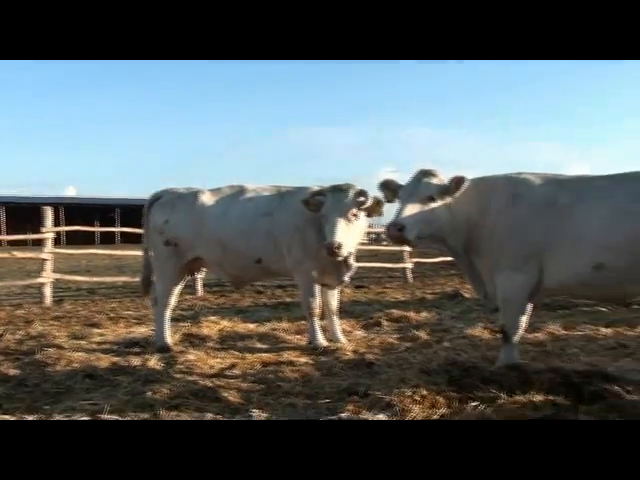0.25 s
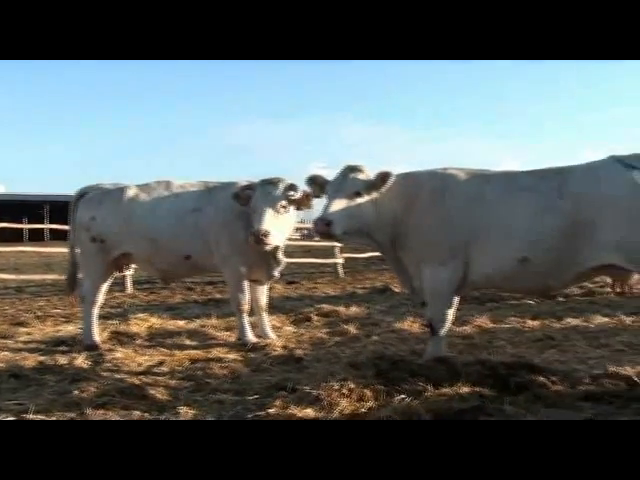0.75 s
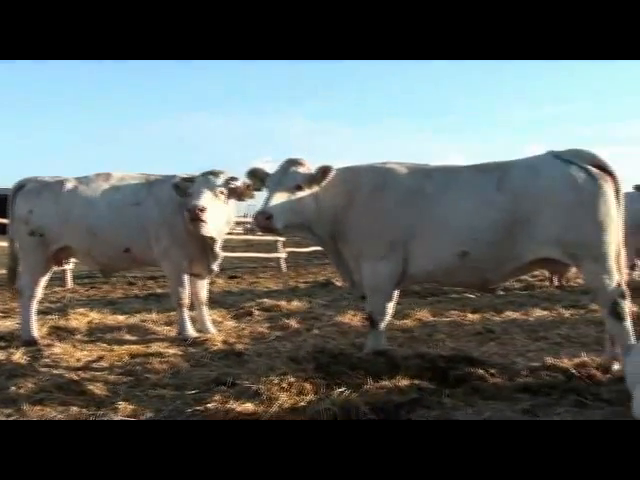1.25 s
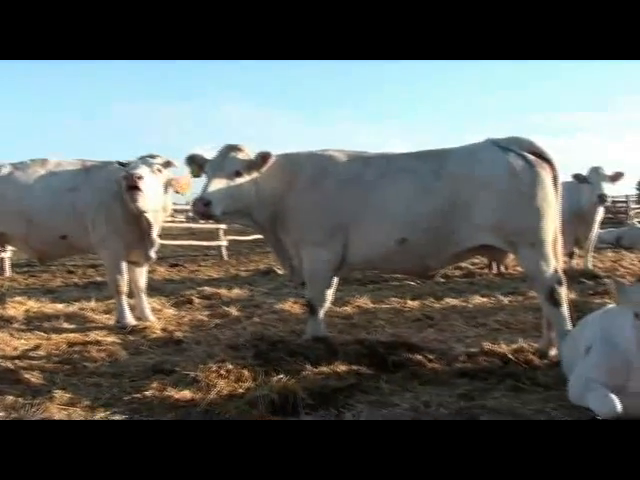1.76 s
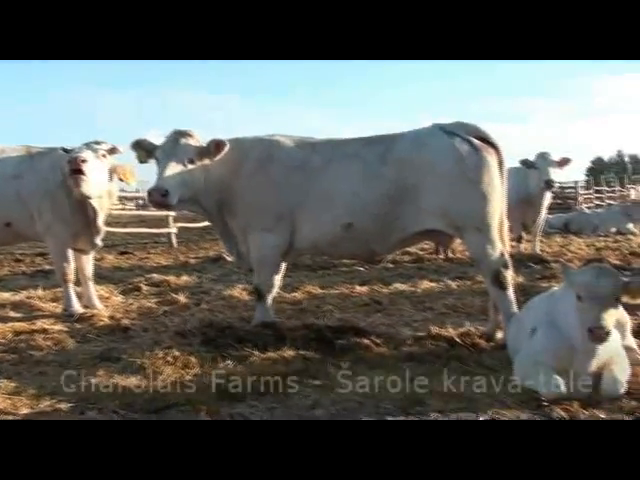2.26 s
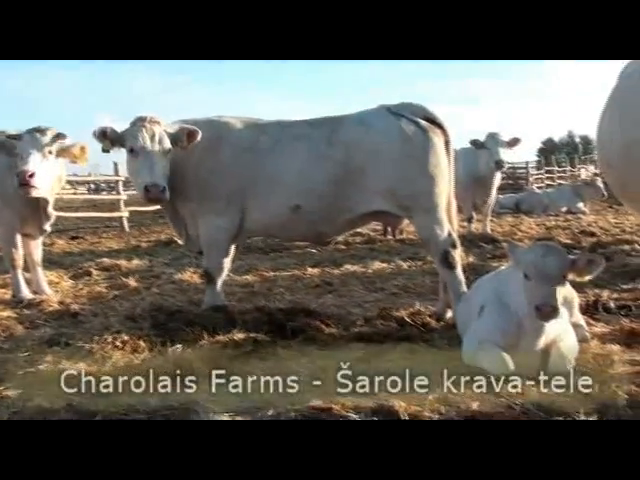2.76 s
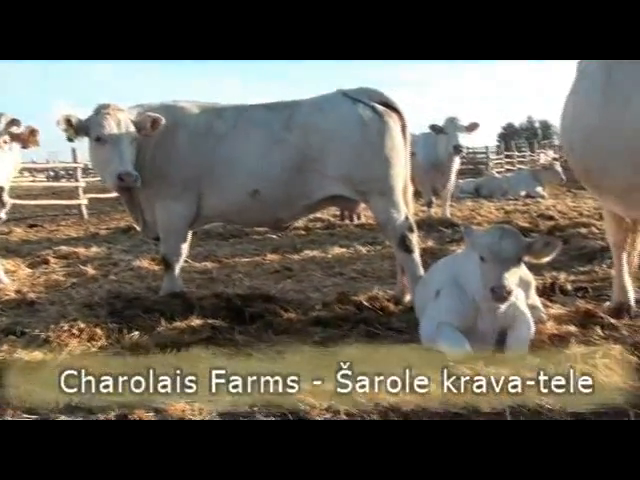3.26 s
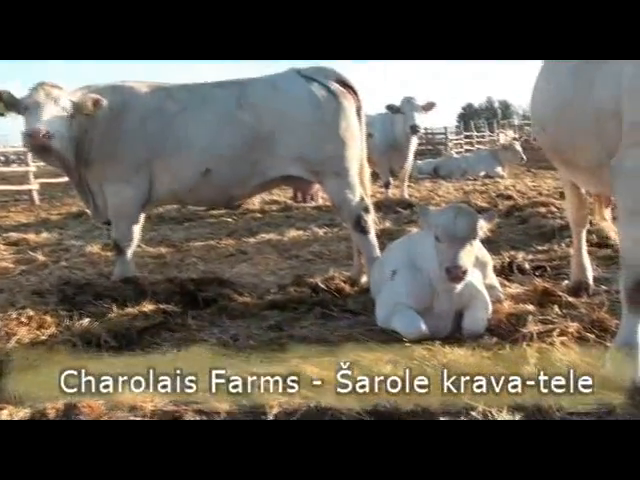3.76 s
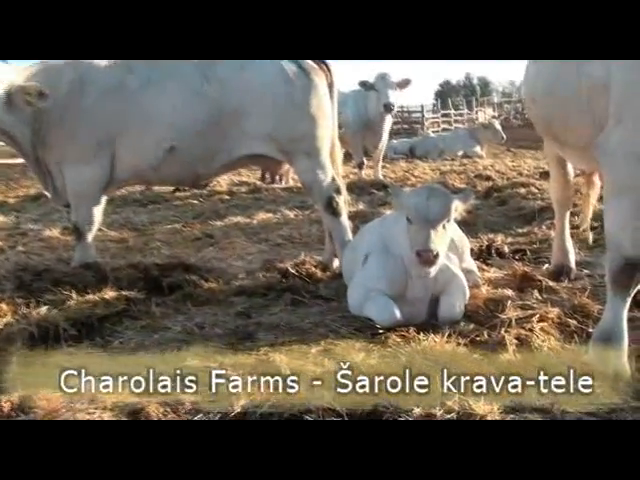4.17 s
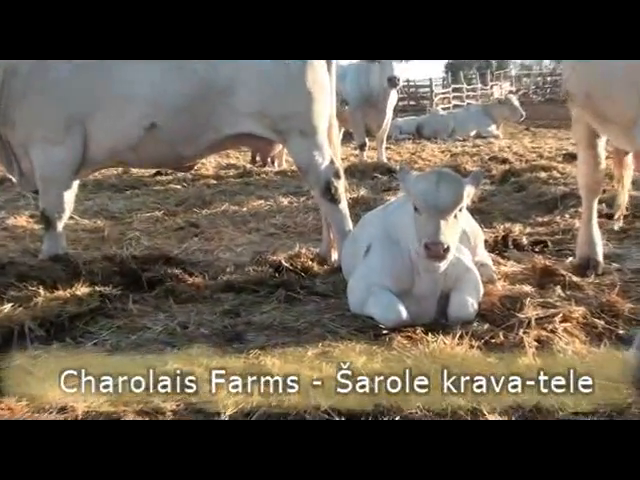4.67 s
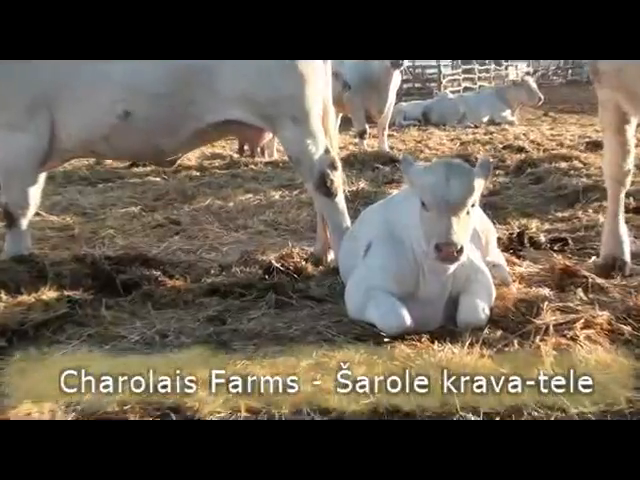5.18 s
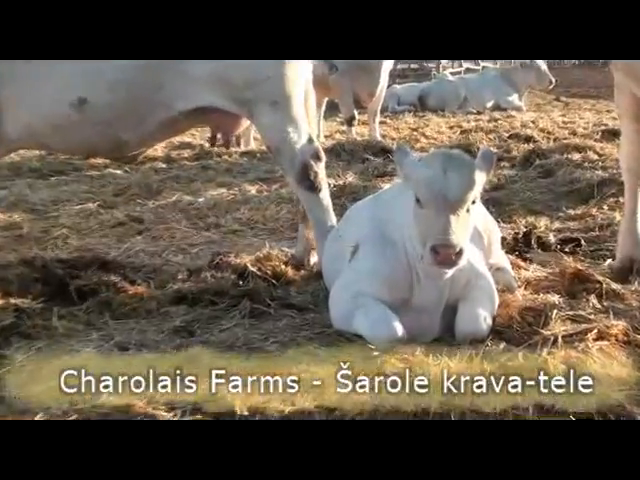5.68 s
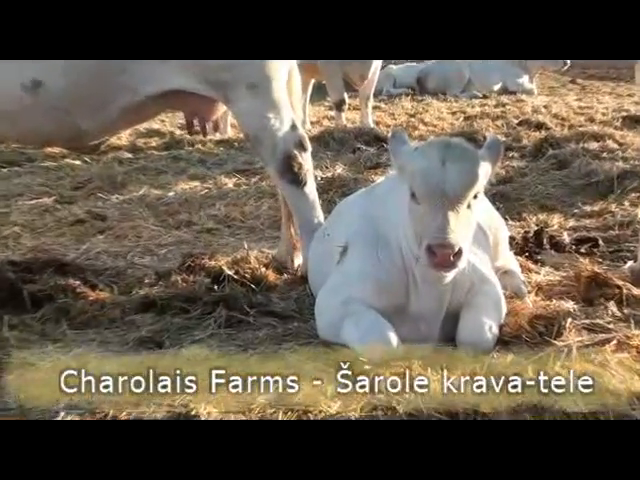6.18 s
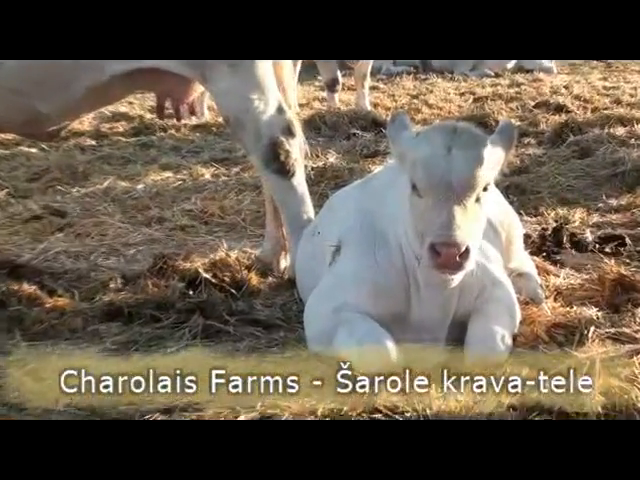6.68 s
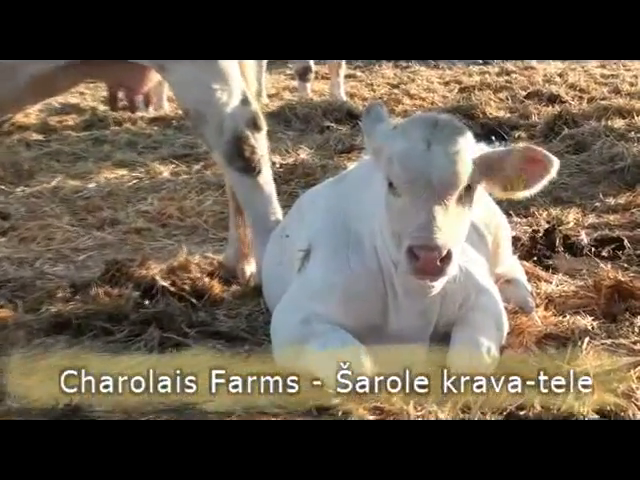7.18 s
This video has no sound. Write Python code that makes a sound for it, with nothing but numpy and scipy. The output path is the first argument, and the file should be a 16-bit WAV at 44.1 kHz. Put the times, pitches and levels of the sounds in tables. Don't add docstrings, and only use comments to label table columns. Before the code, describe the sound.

Cows take turns lowing outdoors. A rough calf answers quietly at the start and again under the first big moo. The second call climbs to a strained pitch; the third cracks open while it ends, then falls away. Air hiss and distant engine rumble remain, with tiny straw snaps, until a final closed-mouth groan grows with a far cow behind. The nearest animals sound fairly dry, spread modestly across stereo.

```python
import sys
import numpy as np
from scipy import signal
from scipy.fft import rfft, irfft
from scipy.io import wavfile
from scipy.ndimage import uniform_filter1d

SR = 44100
rng = np.random.default_rng(int(sys.argv[2]) if len(sys.argv) > 2 else 0)


def makeup_ratio(level_db):
    decades = np.asarray(level_db, float) / 20
    return 10 ** decades


def generate_wav(signal):
    frames = np.transpose(np.atleast_2d(signal))
    scaled = np.clip(frames, -1, 1) * 32767
    pcm = np.round(scaled).astype(np.int16)
    wavfile.write(sys.argv[1], SR, pcm)


N = 327222

# start_s [s], pitch_hz [Hz], level_db [dB]; a START creaks up to its MOO
TAIL_MOO = [(0.0, 138.9, -20)]
FIRST_MOO = [(0.629, 52.4, -56.5), (0.859, 66.3, -31.5), (1.046, 76.67, -27), (1.173, 85.5, -23.5),
             (1.287, 96.7, -18), (1.547, 120.4, -17), (1.659, 127.4, -19.5), (1.813, 133, -17),
             (2.297, 137.1, -17)]
SECOND_START = [(1.8, 90.9, -31), (1.98, 98, -31), (2.141, 105, -36.5), (2.399, 111.3, -26)]
SECOND_MOO = [(2.43, 112.1, -20), (2.851, 120.1, -19), (3.06, 127.4, -17), (3.222, 136.8, -15),
              (3.552, 150.9, -18.5), (3.691, 157.3, -17.5), (3.811, 159.5, -17.5), (3.983, 160, -18)]
THIRD_START = [(3.451, 69.2, -43), (3.751, 79.8, -31.5), (3.979, 103.8, -33), (4.111, 113.5, -28.5),
               (4.14, 115.8, -24)]
THIRD_MOO = [(4.166, 119.5, -14.5), (4.244, 124.3, -18), (4.402, 131.6, -14.5), (4.522, 133.1, -15.5),
             (4.624, 137, -17), (4.898, 139.1, -15.5), (4.978, 137.8, -16.5)]
LAST_MOO = [(6.58, 64.2, -62), (6.66, 70.6, -52), (6.74, 74.15, -33), (6.9, 82.06, -23.5),
            (7.0, 85.2, -22.5), (7.25, 92.5, -19.5), (7.42, 95.15, -19.5)]
CALF_FIRST = [(0, 153.7, -26), (.2, 176.6, -25), (.25, 206.2, -29.5), (.33, 209.3, -25),
              (.46, 218.6, -27.5), (.5, 208.3, -25), (.57, 196.3, -28), (.66, 188, -57.5)]
CALF_SECOND = [(1.76, 170, -52), (1.8, 178.4, -31), (2.0, 198.4, -26), (2.15, 204.3, -23),
               (2.36, 182.8, -24.5), (2.44, 175.2, -21), (2.46, 172, -44)]
FAR_HUM = [(5.75, 88.6, -52), (5.95, 93.9, -48), (6.45, 96.5, -45), (6.9, 128, -30.5), (7.05, 144.6, -29),
           (7.28, 143, -22.5), (7.42, 163.2, -15)]
# end_s [s], pitch_hz [Hz], level_db [dB]
ENDS = [
    (0.128, 93.6, -90),
    (2.462, 95.4, -73),
    (4.177, 99.1, -25),
    (5.2, 88.8, -48),
]
FALL = [
    (0.351, 0.0712, 0.016),
    (.55, 0.165, 0.007),
    (0.779, .6, 0.1),
]

# frequency_hz [Hz], level_db [dB]
CREAK = [(100, 14.5), (232, -1), (376, -2), (723, 11), (1080, -12), (1580, 14.5), (1720, 4), (2260, -3),
         (2640, 8), (2950, -9)]
NASAL = [(180, 5.5), (265, 10.5), (356, 4), (705, 4.5), (1060, -14.5), (1360, 2.5), (1520, 11), (1750, -20),
         (2010, 14.5), (2180, -9), (2480, 6), (3000, -9)]
UNSEALED = [(180, -14), (295, -16), (551, -19.5), (665, -5), (872, -49), (1170, -45), (1300, -11),
            (1670, -22.5), (1920, -11.5), (3000, -24)]
PARTING = [(70, -19), (186, -1), (279, -35), (448, -13.5), (532, -19), (740, 5.5), (1030, -20), (1700, -14),
           (1960, 1.5), (2200, -27), (3000, -16)]
POPPED = [(98, -15), (196, -14), (294, -30), (390, -12), (590, -11.5), (790, 7.5), (880, -9), (980, 3),
          (1080, -17), (1370, -21), (1470, 0.5), (1600, -20), (1810, 3), (1960, -18), (2150, -9),
          (2350, -34), (2450, -9.5), (3000, -38)]
HALF_OPEN = [(105, -15), (215, 7), (315, -24), (420, -6), (630, -10.5), (830, 8), (945, -7), (1260, -20),
             (1470, -0.5), (1600, -21), (1785, -1.5), (2100, -23), (2420, -10), (3000, -33.5)]
OPENING = [(125, -2), (250, -3), (375, -9.5), (560, -1), (750, 5), (1000, -16.5), (1125, 1), (1250, -14.5),
           (1500, 1), (1625, -15.5), (1750, 2.5), (1875, -24), (2400, -5), (3000, -25)]
OPEN = [(105, 1), (140, -0.5), (271, -6), (552, 1), (723, -27.5), (833, 6.5), (1020, -58.5), (1210, -2.5),
        (1770, -10), (3000, -23.5)]
LOWING = [(120, -9), (212, 9.5), (248, 1.5), (360, -10.5), (480, 0.5), (720, -10), (840, -0.5),
          (960, -21.5), (1190, 5.5), (1320, -13.5), (1440, -2.5), (1680, -6.5), (1900, -21.5), (2100, -12),
          (3000, -28)]
RISING = [(100, -15), (147, 21.5), (392, 3), (568, 9.5), (673, -10.5), (845, 17.5), (961, -7), (1240, 17),
          (1470, -0.5), (1770, 0.5), (3000, -24.5)]
PRESSED = [(150, -1.5), (300, -23.5), (450, 0.5), (750, -7), (880, 0), (1050, -15), (1200, 6), (1350, -6),
           (1650, -2), (1850, -18), (2100, -7), (2550, -32), (3000, -20)]
STRAINED = [(120, 20.5), (168, 2), (288, -52), (468, 19.5), (637, 0.5), (812, 12.5), (968, 1.5),
            (1300, 17.5), (1800, 0.5), (2290, 1), (3000, -48)]
CRACK = [(90, -15), (248, 3), (357, -6), (734, 20.5), (888, -11), (1120, 9), (1460, -12), (2050, 11),
         (2300, -5), (2650, 7.5), (3000, -20)]
BREAKING = [(120, -15), (248, -8), (370, -16), (620, 2), (800, -7), (1100, 5), (1400, -1), (1600, -9),
            (2050, -0.5), (2400, -20.5), (3000, -22)]
SETTLING = [(128, -10.5), (256, -6), (384, -22), (580, 7), (1024, -15.5), (1150, 7.5), (1280, -28),
            (1410, -2), (1540, -25), (1660, -3.5), (1800, -21), (2000, -2), (2300, -19), (2430, -13.5),
            (3000, -16)]
WIDENING = [(134, -4), (268, -5), (400, -31.5), (536, 8), (740, -0.5), (938, -10.5), (1200, 3),
            (1340, -7.5), (1600, -9), (1740, -8), (2010, -6), (2140, -36), (2280, -6), (2410, -30),
            (3000, -22)]
BELLOW = [(140, 6.5), (330, -23), (430, -18.5), (553, 7.5), (690, -2.5), (830, 6), (968, -23), (1100, -1),
          (1240, -9.5), (1385, 1.5), (1520, -24.5), (1660, -4.5), (1800, -13.5), (1940, -2.5),
          (2200, -15.5), (2480, -26), (2630, -9), (3000, -30)]
CLOSING = [(110, -24), (225, 7.5), (315, -18), (500, 1), (900, -10.5), (1200, -2.5), (2000, -11),
           (3000, -27)]

# frequency_hz [Hz], level_db [dB]
CREAK_TREBLE = [(3050, 4), (3260, 10), (3500, 1.5), (3800, -11.5), (4200, 4.5), (4600, -21), (5000, -5),
                (5400, -13), (5900, -2.5), (6400, -17), (6950, 1), (7500, -18), (8100, -4), (9000, -17.5),
                (10500, -14), (12000, -37), (15600, -77)]
SWELL_TREBLE = [(3000, 1), (3700, -21), (5000, -8), (6100, -10), (6850, 2), (7600, -10.5), (10000, -15),
                (15600, -70)]
FIRST_TREBLE = [(3000, 1), (3350, -5.5), (4180, -6.5), (4800, -7), (5330, -5.5), (5900, -10), (7410, -4.5),
                (10000, -19), (15600, -69)]
LATE_TREBLE = [(3000, -22), (3400, -11), (4300, -21), (4800, 3.5), (5300, -13), (6700, -15.5), (10000, -12),
               (15600, -63)]
SECOND_TREBLE = [(3000, -11.5), (3830, -10.5), (4530, -24.5), (5420, -17), (6050, -24), (6800, -16),
                 (7600, -11), (8500, -21.5), (12000, -34.5), (15600, -38)]
CRACK_TREBLE = [(3000, 1.5), (3250, -6), (3650, 1.5), (4300, -8), (5200, -22), (6400, -2), (7300, -14.5),
                (10000, -18), (13000, -55)]
THIRD_TREBLE = [(3000, -34), (3200, 6), (3450, -37), (3700, 2.5), (4050, -18), (4400, -5.5), (4800, -21),
                (5500, -18.5), (6150, -6.5), (7400, -23), (9300, -14.5), (10800, -33)]
ONSET_TREBLE = [(3000, 5), (3600, -6), (4050, 3), (4400, -25), (4800, -3), (5300, -20), (6300, -12),
                (7000, -26), (8100, -17), (9000, -24), (12000, -48)]
LAST_TREBLE = [(3000, -5), (3400, 2.5), (3700, -17), (3950, 6), (4250, -20.5), (4600, 7.5), (4850, -7.5),
               (5080, 3), (5600, -19.5), (6200, -4), (6900, -24), (7400, -7), (7700, -38), (8100, 0.5),
               (8700, -34), (9600, -10), (12000, -30.5)]
END_TREBLE = [(3000, -13), (3570, 4.5), (4100, -6.5), (4900, -2), (5200, -5), (5500, 1.5), (6300, -21),
              (7900, -9.5), (8800, -17), (9950, -7.5), (11000, -18), (13000, -45)]

# [Hz, dB]
TAIL_MOUTH = [(.03, 0.146, -20.5, 0.91, [(100, -8), (158, 0), (283, -3.5), (683, -10), (858, -0.5),
              (1000, -15), (1430, -4), (3000, -22.5)])]
FIRST_LIPS = [(0.8, 0, -9, 1.025, CREAK), (1.0, .04, -2, .998, CREAK), (1.118, 0.06, -8, 0.98, CREAK),
              (1.19, 0.07, -30, 0.97, PARTING), (1.255, .07, -30, .95, PARTING),
              (1.285, .05, -26, 1.001, POPPED), (1.41, 0.04, -26, 1.001, HALF_OPEN),
              (1.66, 0.05, -26, 1.001, OPENING), (2.1, 0.11, -28, 1.067, OPEN)]
SECOND_LIPS = [(2.36, 0.076, -28.5, 1.03, [(100, -40), (215, 0.5), (330, -21.5), (800, -20), (1500, -24.5),
               (3000, -44)]), (2.55, 0.13, -16, 0.99, LOWING), (2.85, .05, -20, 1.01, LOWING),
               (3.25, 0.084, -11.5, 1.02, RISING), (3.53, 0.053, -18.5, 0.99, PRESSED),
               (3.9, 0.078, -5.5, 0.96, STRAINED), (4.02, .06, -5, 0.974, STRAINED),
               (4.11, 0.23, -13.5, 0.97, CLOSING)]
THIRD_LIPS = [(3.95, 0.085, -5.5, 1.002, CREAK), (4.125, 0.14, -12, .98, CREAK),
              (4.145, 0.2, -6, 1.012, CRACK), (4.2, 0.14, -10, 0.943, CRACK),
              (4.225, 0.1, -19.5, 1.03, BREAKING), (4.33, 0.03, -23, 1.001, SETTLING),
              (4.53, 0.037, -24.5, 1.001, WIDENING), (4.7, 0.045, -20.5, 1.02, BELLOW),
              (5.038, 0.02, -20.5, 0.97, BELLOW), (5.14, 0.52, -24.5, 1.02, CLOSING)]
LAST_JAW = [(6.699, 0.03, -3, 1.035, NASAL), (6.8, .03, 1.5, 1.018, NASAL), (6.95, 0.05, 4, .998, NASAL),
            (7.1, 0.05, 2, 0.975, NASAL), (7.25, .1, -3, .955, NASAL), (7.357, 0.15, -27.5, 0.93, UNSEALED)]
CALF_MOUTH = [(.221, 0.18, -41.5, 0.94, [(120, -11.5), (180, -12), (420, -42.5), (500, -21), (596, -72),
              (1010, -32.5), (3000, -33)]), (0.228, 0.36, -13, 0.93, [(150, 10), (230, 9.5), (435, -2.5),
              (1640, 2.5), (2700, -0.5), (3000, -14)])]
HOARSE_MOUTH = [(2.1, 0.39, -13, 0.924, [(150, -12), (550, 0.5), (800, 6.5), (1050, 1.5), (1450, 3),
                (2000, 1.5), (2700, -5)])]
HUM_MOUTH = [(6.201, 0.095, -80, 0.76, [(90, -18), (190, -2.5), (300, -29), (560, -25), (1500, -66)]),
             (7.1, 0.19, -99, 0.37, [(90, 19), (150, -29), (230, -4), (1500, -42)])]

# delay_s [s], level_db [dB]
SHED_ECHOES = [
    (.07, -18.5),
    (.18, -29.5),
]
# centre_s [s], length_s [s], resonance_hz [Hz], level_db [dB]
GRUNTS = [
    (2.55, 0.49, 825, -34.5),
    (5.329, 0.13, 800, -45.5),
    (6.447, 0.15, 2395, -52.5),
    (7.33, 0.59, 1070, -34),
]
# start_s [s], peak_db [dB], centre_hz [Hz], left_minus_right_db [dB]
TICKS = [
    (0.611, -32, 5350, 5),
    (1.497, -24, 5200, 9),
    (3.157, -24.5, 5630, 10.5),
    (5.498, -46, 6000, 21),
    (6.802, -33, 6100, 19),
]
# time_s [s], level_db [dB]
DRONE = [(0, -41.5), (.9, -45.5), (3.0, -45), (3.6, -49), (4.2, -52), (4.6, -65), (5.2, -49), (6.4, -45),
         (7.42, -36.5)]
# frequency_hz [Hz], density_db [dB per Hz]
YARD = [(55, -16.5), (110, 0.5), (240, -1), (370, -14), (900, -12), (3000, -24), (5800, -27),
        (11500, -38.5)]
# frequency_hz [Hz], side_minus_mid_db [dB]
YARD_SIDE = [(30, -4), (100, -40), (400, -15), (2200, -9), (7200, -6.5), (12000, -30)]
# time_s [s], level_db [dB]
LULL = [
    (2.601, 9),
    (4.501, -1.5),
    (5.1, -3),
    (5.4, 2),
]


def herd():
    calls = (TAIL_MOO, FIRST_MOO, SECOND_START + SECOND_MOO, THIRD_START + THIRD_MOO)
    tail, first, second, third = map(falling, calls, np.array(ENDS))
    first_trebles = 5 * [CREAK_TREBLE] + 2 * [SWELL_TREBLE] + [FIRST_TREBLE, LATE_TREBLE]
    third_trebles = 2 * [CREAK_TREBLE] + 2 * [CRACK_TREBLE] + 6 * [THIRD_TREBLE]
    last_trebles = 2 * [ONSET_TREBLE] + 2 * [LAST_TREBLE] + 2 * [END_TREBLE]
    near = dict(bounce_db=-5)
    out = moo(tail, TAIL_MOUTH, [THIRD_TREBLE], pan_db=-5.0)
    out += moo(first, FIRST_LIPS, first_trebles, pan_db=2.0, breath_hz=5300, **near)
    out += moo(second, SECOND_LIPS, 8 * [SECOND_TREBLE], pan_db=-2.17, **near)
    out += moo(third, THIRD_LIPS, third_trebles, pan_db=3.0, breath_hz=4040, **near)
    out += moo(LAST_MOO, LAST_JAW, last_trebles, pan_db=-2.5, breath_hz=6500, **near)
    out += moo(CALF_FIRST, CALF_MOUTH, 2 * [FIRST_TREBLE], pan_db=-5.0, throb_db=2.2, size=1024)
    out += moo(CALF_SECOND, HOARSE_MOUTH, [FIRST_TREBLE], pan_db=-3.0, size=1024)
    out += moo(FAR_HUM, HUM_MOUTH, 2 * [FIRST_TREBLE], pan_db=1.5, size=1024)
    return out


def falling(call, end):
    held = np.array(call[-1])
    return call + [held + np.array(share) * (end - held) for share in FALL] + [end]


def moo(call, mouths, trebles, pan_db, breath_hz=4200, scatter_s=0.017, bounce_db=4.0, throb_db=0, size=2048):
    s, pitch, level_db = np.transpose(call)
    at, period = glottal_pulses(s, pitch)
    hz = np.arange(size // 2 + 1) * SR / size
    rough, shape = vocal_tract(at, hz, mouths, trebles)

    chance = rng.standard_normal((len(at), 2))
    at = at + 0.17 * rough ** 2.16 * period * chance[:, 0]
    puff = breath_puffs(period, size)
    share = np.clip(rough[:, None] + .75 / (1 + (breath_hz / (hz + 1)) ** 4), 0, 1)
    source = np.sqrt(1 - share ** 2) + share * puff

    bounce = 1 + ground_scatter(hz, size, scatter_s, bounce_db)
    throat = causal(shape) * bounce / np.sqrt(uniform_filter1d(np.abs(bounce) ** 2, size=9))
    throat = throat / np.sqrt(2 * np.sum(np.abs(throat) ** 2, axis=1, keepdims=True)) * size
    start = np.floor(at * SR).astype(int)
    shift = np.exp(-2j * np.pi * np.outer(at * SR - start + 8, hz / SR))
    pulses = irfft(panned(throat * shift * source, pan_db * np.clip(hz / 600, 0, 1)), axis=2)

    fade_in = at - s[0] + .03 * (s[0] == 0)
    fade_out = s[-1] - at + .03 * (s[-1] > 7.4)
    fade = np.clip(np.minimum(fade_in, fade_out) / .02, 0, 1)
    throb = 2 * throb_db * np.cos(2 * np.pi * 25 * (at - .23))
    gain_db = np.interp(at, s, level_db) + rough * (4.3 * chance[:, 1] + throb)
    gain = fade * makeup_ratio(gain_db) * np.sqrt(period * SR / size)

    out = np.zeros((2, N + size))
    for k, i in enumerate(start):
        out[:, i:i + size] += gain[k] * pulses[:, k]
    return out[:, :N]


def glottal_pulses(s, pitch):
    t = np.arange(s[0], s[-1], 1 / SR)
    smooth_pitch = uniform_filter1d(np.interp(t, s, pitch), size=1500, mode="nearest")
    cycles = np.cumsum(smooth_pitch) / SR
    at = np.interp(np.arange(1, int(cycles[-1])) - .5, cycles, t)
    return at, 1 / np.interp(at, s, pitch)


def vocal_tract(at, hz, mouths, trebles):
    times, roughness, treble_dbs, stretches, lows = zip(*mouths)
    top = np.clip((hz - 2800) / 400, 0, 1)
    shapes = []
    for low, high, treble_db in zip(lows, trebles, treble_dbs):
        mouth = at_hz(low, np.minimum(hz, 2900))
        throat = at_hz(high, np.maximum(hz, 3100)) + treble_db
        low_cut = 48 * np.log2(np.maximum(low[0][0] / (hz + 1), 1))
        shapes.append((1 - top) * mouth + top * throat - low_cut)
    blend = np.array([np.interp(at, times, row) for row in np.eye(len(mouths))]).T
    rough = np.clip(blend @ roughness, 0, 1)
    stretch = blend @ stretches
    upper = np.clip(hz / 1300, 0, 1) ** 2 + hz / 9000
    rows = zip(stretch, blend @ np.array(shapes))
    return rough, np.array([np.interp(hz / k ** upper, hz, row) for k, row in rows])


def breath_puffs(period, size):
    decay = np.exp(-np.arange(size) / SR / (.5 * period[:, None]))
    puff = rng.standard_normal((len(period), size)) * decay
    return rfft(puff / np.linalg.norm(puff, axis=1, keepdims=True), axis=1)


def ground_scatter(hz, size, scatter_s, bounce_db):
    bounce = rng.standard_normal(size) * np.exp(-np.arange(size) / SR / scatter_s)
    return makeup_ratio(bounce_db) * rfft(bounce / np.linalg.norm(bounce)) * np.clip(hz / 2400, 0, 1) ** 3


def sheds(voices):
    dull = band(voices.mean(axis=0), 670, 5800)
    out = np.zeros((2, N))
    for delay_s, db in SHED_ECHOES:
        smear = rng.standard_normal((2, 1500)) * np.hanning(1500)
        echo = signal.fftconvolve(dull[None], smear / np.linalg.norm(smear[0]), axes=1)
        lag = int(delay_s * SR)
        out[:, lag:] += makeup_ratio(db) * echo[:, :N - lag]
    return out


def grunts():
    t = np.arange(N) / SR
    out = np.zeros(N)
    for s, length_s, hz, db in GRUNTS:
        throat = rms_one(band(rng.standard_normal(N), hz * 0.82, hz * 1.18))
        out += makeup_ratio(db) * throat * np.exp(-(2 * (t - s) / length_s) ** 2)
    return out


def ticks():
    out = np.zeros((2, N))
    lag = np.arange(900) / SR
    for s, db, hz, pan_db in TICKS:
        burst = rng.standard_normal(900) * lag / .003 * np.exp(-lag / 0.0042)
        snap = band(burst, hz * 0.53, hz * 1.26)
        i = int(s * SR) - 60
        out[:, i:i + 900] += panned(makeup_ratio(db) * snap / np.abs(snap).max(), pan_db)
    return out


def drone():
    t = np.arange(N) / SR
    engine = rms_one(band(band(rng.standard_normal(N), 64, 88), 64, 88))
    whine_hz, whine_db = 7650, -71
    whine = rms_one(band(rng.standard_normal(N), whine_hz - 30, whine_hz + 30))
    return makeup_ratio(np.interp(t, *np.transpose(DRONE))) * engine + makeup_ratio(whine_db) * whine


def yard():
    hz = np.arange(N // 2 + 1) * SR / N
    white = rfft(rng.standard_normal((2, N)), axis=1) * makeup_ratio(at_hz(YARD, hz))
    mid, side = irfft(white * [np.ones_like(hz), makeup_ratio(at_hz(YARD_SIDE, hz))], N, axis=1)
    level_db = -45.5 + np.interp(np.arange(N) / SR, *np.transpose(LULL))
    return makeup_ratio(level_db) / np.std(mid) * np.array([mid + side, mid - side])


def at_hz(points, hz):
    points = np.array(points, float)
    return np.interp(np.log(np.maximum(hz, 1)), np.log(points[:, 0]), points[:, 1])


def causal(db):
    cepstrum = irfft(db * np.log(10) / 20, axis=-1)
    half = db.shape[-1] - 1
    cepstrum[:, 1:half] *= 2
    cepstrum[:, half + 1:] = 0
    return np.exp(rfft(cepstrum, axis=-1))


def band(x, low_hz, high_hz):
    return signal.sosfilt(signal.butter(2, [low_hz, high_hz], "band", fs=SR, output="sos"), x)


def rms_one(x):
    return x / np.sqrt(np.mean(x ** 2) + 1e-20)


def panned(x, db):
    return np.array([x * makeup_ratio(db / 2), x * makeup_ratio(-db / 2)])


def scene():
    voices = herd()
    return voices + sheds(voices) + grunts() + ticks() + drone() + yard()


def band_limit(x):
    return signal.sosfilt(signal.butter(12, 13760, fs=SR, output="sos"), x)


def record(dry):
    mix = 1.074 * np.tanh(dry / 0.89)
    return band_limit(mix)


dry = scene()
out = record(dry)
generate_wav(out)
```